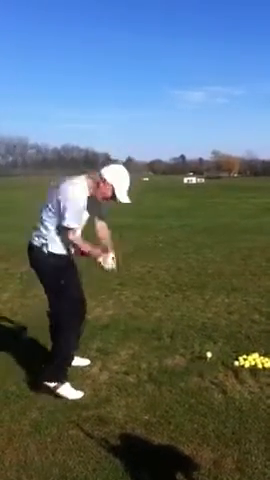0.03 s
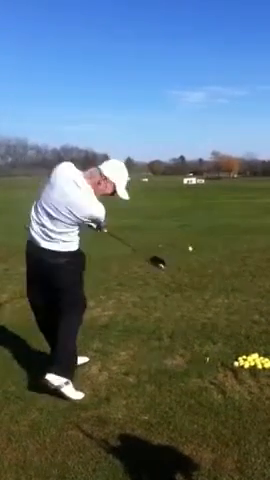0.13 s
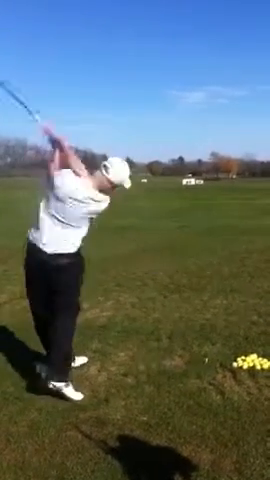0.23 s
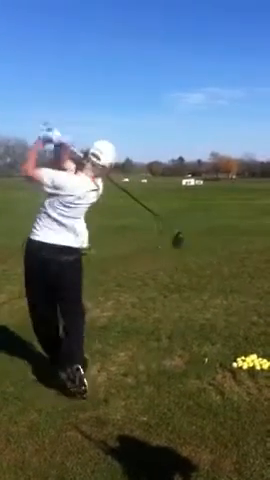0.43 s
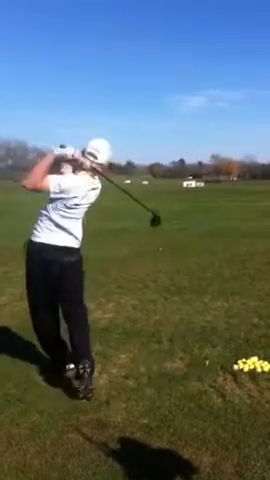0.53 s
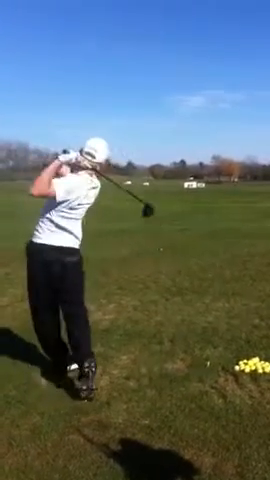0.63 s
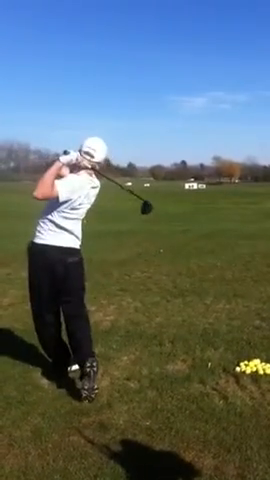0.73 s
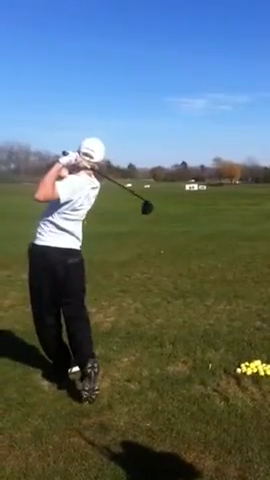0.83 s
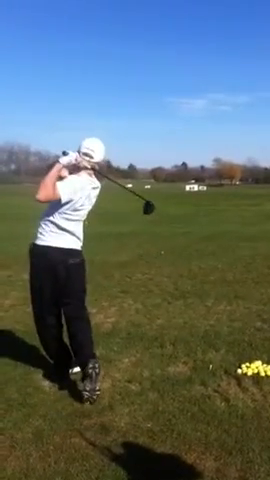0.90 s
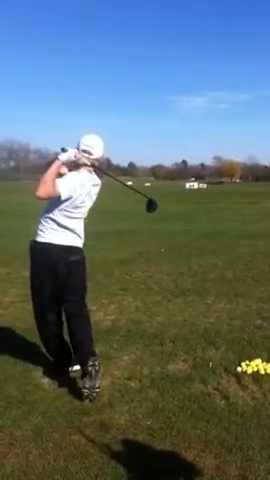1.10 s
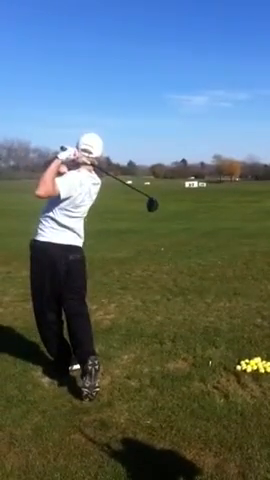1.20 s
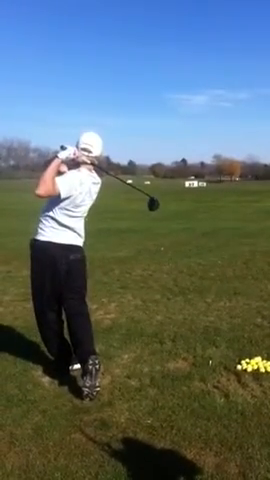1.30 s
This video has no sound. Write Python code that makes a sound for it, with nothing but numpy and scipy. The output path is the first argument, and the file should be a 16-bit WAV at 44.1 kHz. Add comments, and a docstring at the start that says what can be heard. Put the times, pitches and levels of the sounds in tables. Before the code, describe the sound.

A golf club whooshes down and cracks sharply against a ball on an open driving range

```python
"""Golf drive on an open range

A driver swings through a ball: vortices off shaft and head whoosh as noise bands and a hiss, the ball
cracks off the face and the hollow head rings as damped sines over a dense noise of small modes. Things
nearby and the field throw the blow back as smeared copies and a noise tail. Far traffic, hums and wind
rumble lie under it as shaped noise and sines, with small far knocks. The phone's gain control ducks
after loud peaks and recovers."""
import sys
import numpy as np
from scipy import signal
from scipy.fft import rfft, irfft, next_fast_len
from scipy.io import wavfile
from scipy.ndimage import uniform_filter1d, map_coordinates

SR = 44100
rng = np.random.default_rng(int(sys.argv[2]) if len(sys.argv) > 2 else 0)


def unload_audio(sound):
    """Save the sound as a 16-bit wav file, at the path given as the first command line argument."""
    columns = np.transpose(np.atleast_2d(sound))
    # keep every value between -1 and 1, then stretch to whole-number steps
    steps = np.round(np.clip(columns, -1, 1) * 32767)
    wavfile.write(sys.argv[1], SR, steps.astype(np.int16))


def makeup_ratio(level_db):
    """Linear amplitude ratio for a level in decibels (20 dB per factor of ten)."""
    decades = np.asarray(level_db, float) / 20
    return 10 ** decades


N = 59535
T = np.arange(N) / SR  # time, s
STRIKE_S = 0.24788  # club meets ball


def unit(x):
    """Scale a signal to rms 1."""
    return x / np.sqrt(np.mean(x ** 2) + 1e-20)


def along(points, hz):
    """Interpolate (hz, value) points on a log frequency axis."""
    point_hz, value = np.transpose(points)
    return np.interp(np.log(hz + 1), np.log(point_hz + 1), value)


def over_time(points):
    """Interpolate (time_s, value) points over the whole scene."""
    return np.interp(T, *np.transpose(points))


def filtered(x, response):
    """Multiply the spectrum of x by a response of frequency in Hz."""
    size = next_fast_len(N + 8192)
    spectrum = rfft(x, size) * response(np.fft.rfftfreq(size, 1 / SR))
    return irfft(spectrum, size)[:N]


def noise(response):
    """Coloured noise of rms 1."""
    return unit(filtered(rng.standard_normal(N), response))


def wobble(rate):
    """A smooth random curve through rate knots a second."""
    knots = rng.standard_normal(int(N * rate / SR) + 4)
    return map_coordinates(knots, [T * rate])


def high_pass(hz, edge_hz):
    """Second-order bass cut, as a response."""
    return (1j * hz / (edge_hz + 1j * hz)) ** 2


def ring(modes, start_s, rise_s, flutter_db=0, flutter_rad=0):
    """Modes set off by one blow: sines decaying by 60 dB in t60, with random flutter of level and phase."""
    flutter_per_s = 380  # random knots a second
    length = 8000
    first = int(np.ceil(start_s * SR))
    t = (first + np.arange(length)) / SR - start_s
    hz, level_db, t60_s = np.transpose(modes)[:, :, None]

    knots = rng.standard_normal((2 * len(modes), 200))
    curves = [np.interp(t * flutter_per_s, np.arange(200), k) for k in knots]
    level_curve, phase_curve = np.reshape(curves, (2, len(modes), -1))

    envelope = makeup_ratio(level_db - 60 * t / t60_s + flutter_db * level_curve)
    tones = envelope * np.sin(2 * np.pi * hz * t + flutter_rad * phase_curve)
    out = np.zeros(N + length)
    out[first:first + length] = tones.sum(0) * (1 - np.exp(-t / rise_s))
    return out[:N]


def ambient():
    """Distant traffic and air as slightly patchy shaped noise, with a wavering hum and two faint tones."""
    # spectrum of the far wash: pitch_hz, relative density_db (per Hz)
    wash_colour = [(18, -12), (45, -16), (98, -8), (190, -4.5), (290, -13), (415, -11.5), (526, -17.5),
                   (600, -12.5), (700, -13.5), (900, -10), (1630, -18), (2600, -31.5), (6000, -34.5),
                   (16000, -36.5)]
    # slow swell of the traffic: time_s, change_db
    traffic_swell = [(0, 0), (.6, -1), (.9, -1), (1.24, 1.5), (1.35, 1)]
    # weaker steady-pitched hums: pitch_hz, level_db
    faint_hums = [(415, -75), (592, -73)]
    wash_db, hum_db = -56, -61.5
    hum_hz, hum_wander_hz = 238.6, 2.5

    # patches of level, smoothed over frequency and then time
    z = signal.stft(rng.standard_normal(N), nperseg=512)[2]
    patches = uniform_filter1d(rng.standard_normal(z.shape), 6, 0)
    patches = uniform_filter1d(patches, 12, 1)
    patchy = signal.istft(z * makeup_ratio(1.2 * unit(patches)), nperseg=512)[1][:N]
    wash = unit(filtered(patchy, lambda hz: makeup_ratio(along(wash_colour, hz))))

    hum_phase = 2 * np.pi * np.cumsum(hum_hz + hum_wander_hz * wobble(8.3)) / SR
    hum = np.sqrt(2) * np.sin(hum_phase) * makeup_ratio(1.5 * wobble(5.6))
    faint = sum(makeup_ratio(db + 2.5 * wobble(8)) * np.sin(2 * np.pi * hz * T) for hz, db in faint_hums)
    return makeup_ratio(wash_db + over_time(traffic_swell)) * wash + makeup_ratio(hum_db) * hum + faint


def wind():
    """Low lumpy rumble of light gusts: bass noise with a wandering level."""
    # slow course of the rumble: time_s, level_db
    gust_level = [(0, -62), (.3, -72), (.6, -70), (.8, -61), (1.1, -60), (1.35, -60)]
    # spectrum of the rumble: pitch_hz, relative density_db (per Hz)
    rumble_colour = [(40, -15), (80, 0), (140, -2.5), (200, 0), (300, -25)]
    # a further 40 dB down above 400 Hz
    rumble = noise(lambda hz: makeup_ratio(along(rumble_colour, hz) - 40 * (hz > 400)))
    return makeup_ratio(over_time(gust_level) + 2.5 * wobble(15)) * rumble


def whoosh():
    """Vortices off shaft and head: narrow noise bands and a hiss that swell with club speed."""
    # swell of the vortex bands: time_s, level_db
    swing = [(.12, -78), (0.161, -63.5), (0.179, -51.5), (0.199, -43), (.23, -43), (0.248, -46.5),
             (.26, -55)]
    # vortex bands: centre_hz, width_hz, relative level_db, lateness_db_per_s (positive swells later)
    whistles = [(290, 150, -2, 0), (600, 160, -6, -60), (770, 90, -0.5, -30), (900, 200, -2, 80),
                (1650, 500, -6, 150)]
    # spectrum of the head's hiss: pitch_hz, relative density_db (per Hz)
    air_colour = [(880, -29.5), (1500, 0.5), (1880, -6.5), (2640, -16), (3960, -13.5), (12100, -16.5),
                  (16000, -23)]
    # swell of the hiss: time_s, level_db
    air_level = [(.13, -80), (.16, -63), (.2, -49.5), (.226, -47.5), (.246, -48), (.26, -52), (.33, -60.5),
                 (.42, -80), (.5, -100)]
    follow_db_per_s = 350  # extra fade as the head slows after the strike, and before the first swing point

    outside_s = np.maximum(T - STRIKE_S, 0) + np.maximum(swing[0][0] - T, 0)
    level_db = over_time(swing) - follow_db_per_s * outside_s
    before_strike_s = np.clip(T - STRIKE_S, -0.15, 0)
    bands = np.zeros(N)
    for centre_hz, width_hz, band_db, lateness in whistles:
        band = noise(lambda hz: 1 / (1 + (2 * (hz - centre_hz) / width_hz) ** 2))
        bands += makeup_ratio(band_db + lateness * before_strike_s) * band
    hiss = noise(lambda hz: makeup_ratio(along(air_colour, hz))) * makeup_ratio(over_time(air_level))
    return makeup_ratio(level_db + 2.5 * wobble(60)) * bands + hiss


def strike():
    """Crack, shell ring and rattle from one impact, heard direct and off the ground."""
    # quick modes of ball and face at contact: pitch_hz, relative level_db, t60_s
    crack_modes = [(200, -8, .025), (340, -10, .02), (700, -9, .012), (950, -3, .011), (1241, -3.5, .005),
                   (1674, -5.5, .007), (2120, -6, 0.0026), (2650, -5, .004), (3370, -1, .005),
                   (3800, -3, .004), (4300, -3, .005), (4900, -4, .005), (11300, -3, 0.0092),
                   (14000, -10, 0.0056)]
    # shell modes of the hollow head: pitch_hz, relative level_db, t60_s
    head_modes = [(4210, -25, 0.058), (5490, -8, 0.056), (5623, -6, .05), (5950, -7, .055),
                  (6325, -0.5, 0.054), (6417, -9, 0.077), (6560, -8, 0.056), (6754, -7, .05),
                  (7060, -11.5, .05), (7640, -8, .04), (8550, -11, .045), (10206, -14, .04),
                  (11270, -14, 0.034), (12530, -12, .03)]
    # spectrum of the many small shell modes, heard as noise: pitch_hz, relative level_db
    dense_colour = [(1500, -29.5), (3000, -15), (3900, -8), (5000, -12), (5500, 0), (7200, 1), (8700, -2),
                    (9500, -10), (16000, -18)]
    strike_db, low_cut_hz = -8.5, 450
    ground_s, ground_db = 0.0012, -15  # delay and relative level of the ground bounce

    t = T - STRIKE_S
    crack = ring(crack_modes, STRIKE_S, rise_s=0.00005)
    # each mode flutters as the head turns
    head = ring(head_modes, STRIKE_S, rise_s=0.0015, flutter_db=4, flutter_rad=0.73)
    # rattle of tee and grass, t60 0.03 s
    splash = makeup_ratio(-10 - 60 * np.abs(t) / 0.03) * noise(lambda hz: (hz / (hz + 5000)) ** 2)
    # small shell modes, t60 0.081 s
    dense = makeup_ratio(-11 - 60 * np.abs(t) / 0.081) * noise(lambda hz: makeup_ratio(along(dense_colour, hz)))
    blow = crack + head + (t > 0) * (splash + dense)

    def path(hz):
        bounce = makeup_ratio(ground_db) * np.exp(-2j * np.pi * hz * ground_s)
        return (1 + bounce) * high_pass(hz, low_cut_hz)

    return makeup_ratio(strike_db) * filtered(blow, path)


def echoes(blow):
    """Smeared, thinned copies of the blow from a few objects, and the field's scatter as decaying noise."""
    # reflecting objects: delay_s, relative level_db (ahead of the edges), smear_s, bass_edge_hz, treble_edge_hz
    objects = [(.0332, -15, 0.000091, 5000, 11000), (.0353, -14, 0.00012, 1500, 8000),
               (.0383, -12, .0001, 500, 22000), (.09, -29, .008, 4500, 9000),
               (.188, -34, 0.0024, 1800, 6000), (.18, -34, .035, 4100, 7300)]
    # spectrum of the field scatter: pitch_hz, relative level_db
    scatter_colour = [(200, -8), (350, 5), (900, 3), (2000, -3), (4000, -4), (5100, -5), (5600, 4),
                      (6800, 4), (7600, -3), (11000, -8), (16000, -16)]
    # decay of the field scatter: pitch_hz, t60_s
    scatter_decay = [(300, .4), (1500, 0.4), (4000, .35), (6300, .32), (12000, .4)]
    scatter_db = -35.5  # at the moment of the strike

    out = np.zeros(N)
    for delay_s, level_db, smear_s, bass_hz, treble_hz in objects:
        t = T - delay_s
        # a rough face: decaying noise with a stronger first sample
        rough = rng.standard_normal(N) + 3 * (t < 1 / SR)
        face = (t >= 0) * np.exp(-np.abs(t) / smear_s) * rough
        copy = signal.fftconvolve(blow, face / np.linalg.norm(face))[:N]
        thinned = filtered(copy, lambda hz: high_pass(hz, bass_hz) / (1 + 1j * hz / treble_hz) ** 2)
        out += makeup_ratio(level_db) * thinned

    scatter = noise(lambda hz: makeup_ratio(along(scatter_colour, hz)))
    hz, t, z = signal.stft(scatter, SR, nperseg=256)
    decay = makeup_ratio(-60 * np.abs(t - STRIKE_S) / along(scatter_decay, hz)[:, None])
    tail = signal.istft(z * decay, SR, nperseg=256)[1][:N]
    return out + makeup_ratio(scatter_db) * tail * (T > STRIKE_S)


def ticks():
    """Small far knocks around the range, each one short damped sine."""
    # knocks: start_s, level_db, pitch_hz, t60_s
    knocks = [(.5694, -35.5, 4600, .0015), (.5694, -48, 10990, .001), (.593, -46, 4500, 0.0022),
              (1.318, -33.5, 900, 0.0058)]
    return sum(ring([(hz, db, t60_s)], start_s, rise_s=0.00024) for start_s, db, hz, t60_s in knocks)


def scene():
    """All sources summed at one microphone."""
    blow = strike()
    return (ambient() + wind() + whoosh() + blow + echoes(blow) + ticks())[None]


def microphone(x):
    """The phone's microphone: bass cut at 120 Hz, treble roll-off and nothing from 16.7 kHz up."""
    # treble roll-off: pitch_hz, gain_db
    roll_off = [(15300, 0), (16000, -12), (16700, -25)]
    return filtered(x, lambda hz: high_pass(hz, 120) * makeup_ratio(along(roll_off, hz)) * (hz < 16700))


def gain_control(x):
    """Gain drops soon after a loud peak and climbs back in a quick and a slow stage."""
    threshold_db, attack_s = -29, 0.0087
    over_db = np.maximum(20 * np.log10(np.abs(x) + 1e-9) - threshold_db, 0)

    def held(share, db_per_s):
        # peak hold that falls at a steady rate
        return np.maximum.accumulate(share * over_db + db_per_s * T) - db_per_s * T

    slow_db = held(share=0.35, db_per_s=5.5)
    quick_db = held(share=0.55, db_per_s=90)
    step = 1 / (attack_s * SR)
    duck_db = signal.lfilter([step], [1, step - 1], np.maximum(slow_db, quick_db))
    return x * makeup_ratio(-duck_db)


def band_limit(x):
    """A steep low-pass at the top of the band."""
    return signal.sosfilt(signal.butter(12, 16800, fs=SR, output="sos"), x)


def record(dry):
    """The phone takes the scene: microphone response, then gain control."""
    mix = gain_control(microphone(dry[0]))[None]
    return band_limit(mix)


dry = scene()
out = record(dry)
unload_audio(out)
```